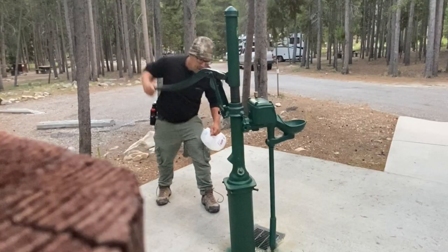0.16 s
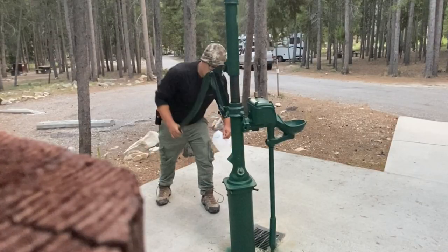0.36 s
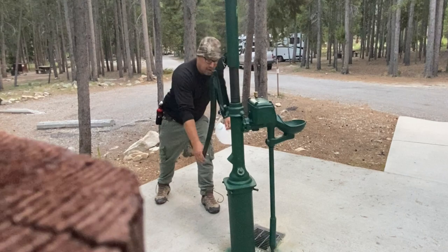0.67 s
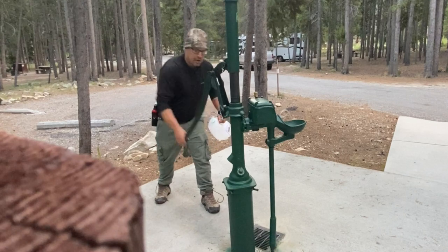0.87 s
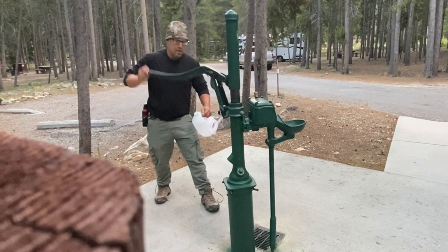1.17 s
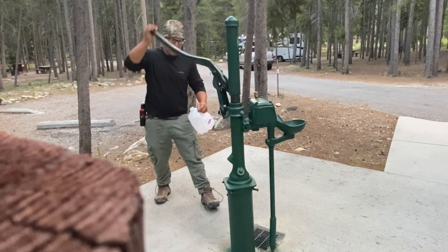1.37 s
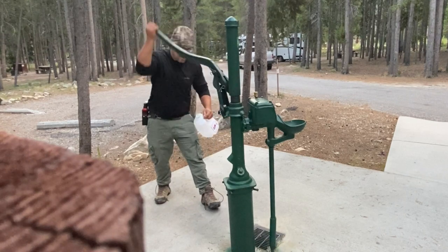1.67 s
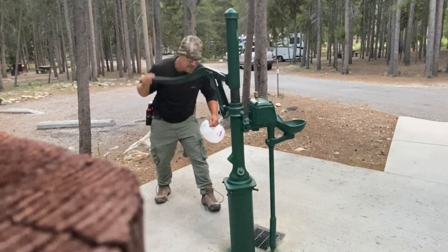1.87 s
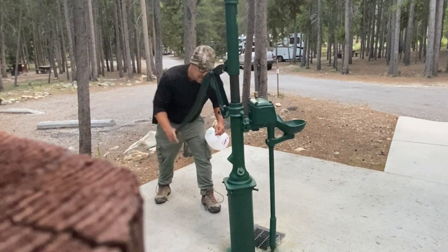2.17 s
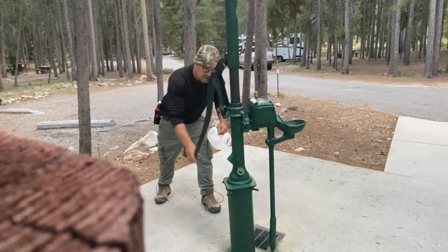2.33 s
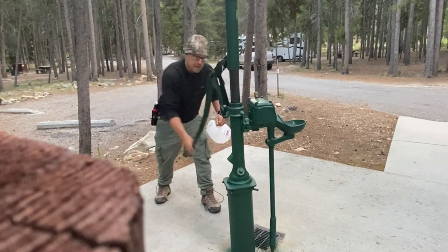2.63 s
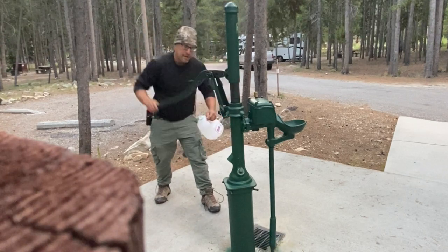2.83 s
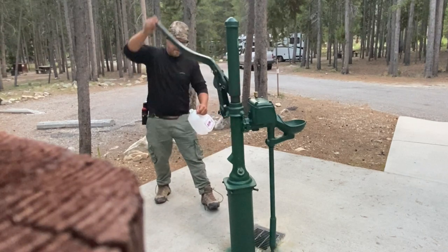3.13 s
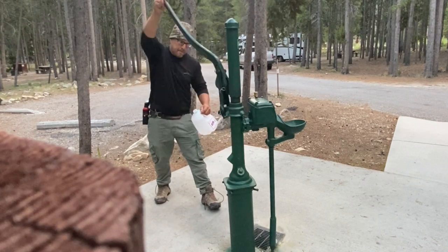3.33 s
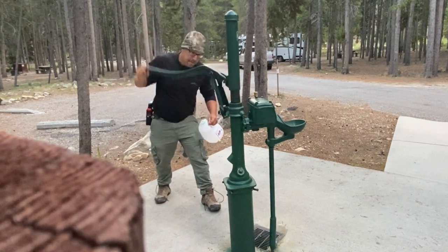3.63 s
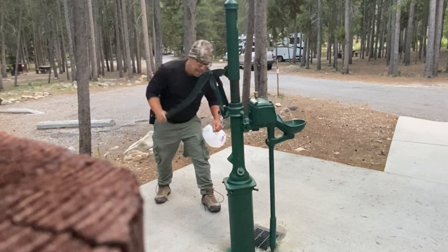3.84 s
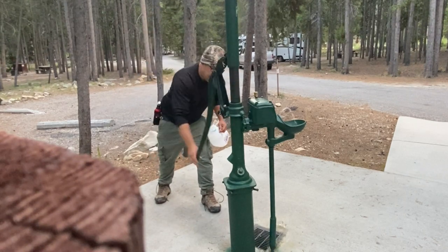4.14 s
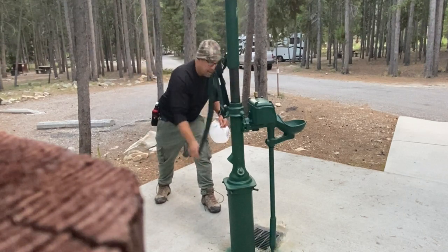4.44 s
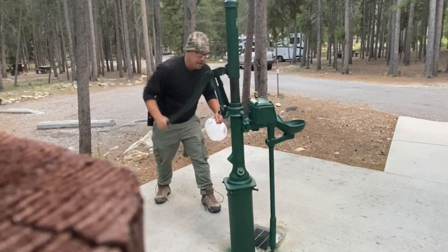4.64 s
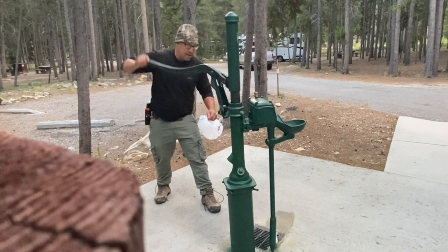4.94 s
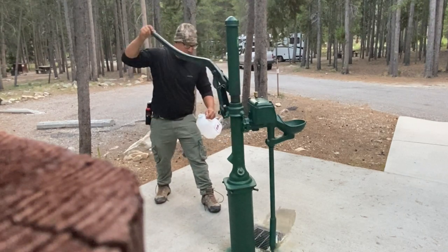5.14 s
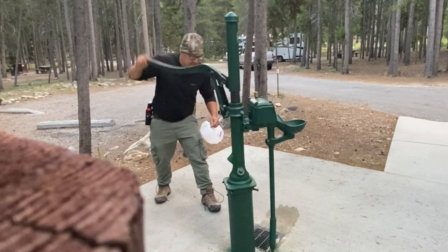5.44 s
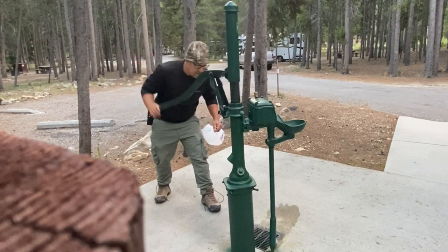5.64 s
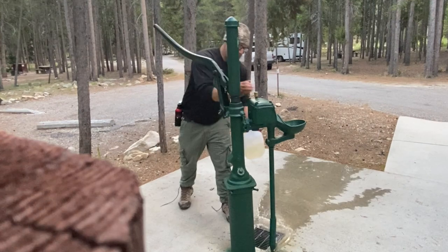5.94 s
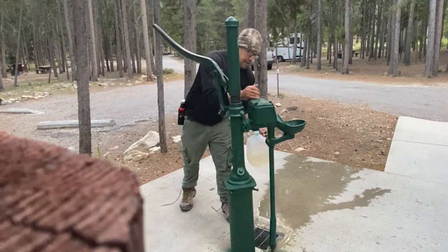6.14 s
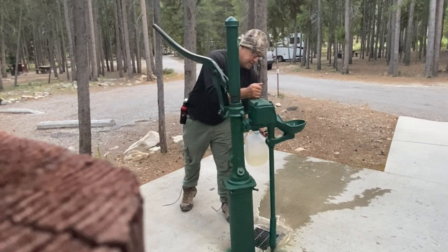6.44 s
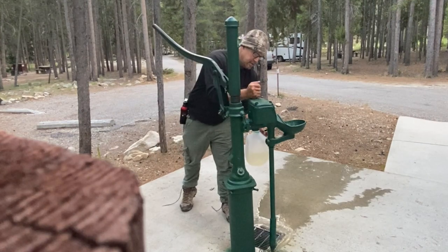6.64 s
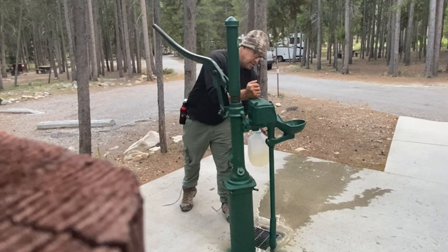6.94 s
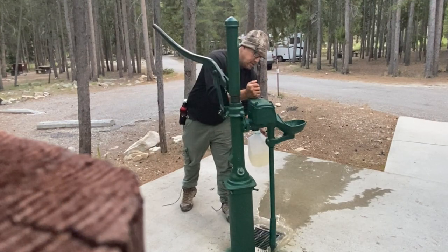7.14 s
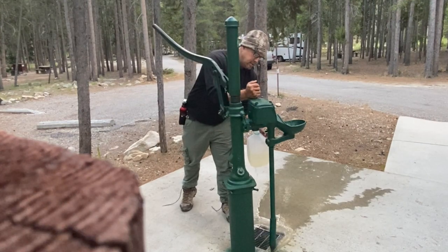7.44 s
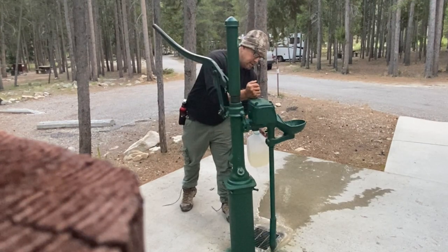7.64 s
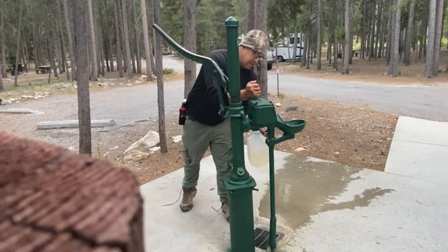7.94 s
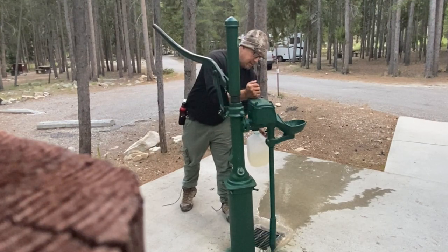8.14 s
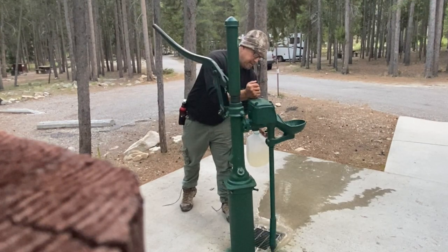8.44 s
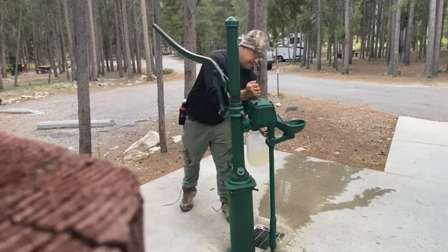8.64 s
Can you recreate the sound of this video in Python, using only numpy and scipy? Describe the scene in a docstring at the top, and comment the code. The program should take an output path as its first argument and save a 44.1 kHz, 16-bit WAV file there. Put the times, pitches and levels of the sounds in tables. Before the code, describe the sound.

Metallic rattling and clanking of an old hand water pump, loudest mid-way, gives way abruptly to dripping and soft bubbling as a jug fills.

```python
"""In a pine wood, a patchy background noise swells and fades, each swell reaching from treble down to bass.
Close by, a cast-iron hand pump is worked: lever blows and rubbing noise ring the casting's modes,
under a flickering hiss; early on, a loose pin ticks briefly as damped sines. Soft low puffs lean to the right.
Water gushes from the spout as spattered noise, with drops and bubbles as damped sines rising in pitch;
rubbing and sizzle stop abruptly, then water fills a jug with low glugs. A faint echo follows the pump."""
import sys
import numpy as np
from scipy import signal
from scipy.fft import rfft, irfft, next_fast_len
from scipy.io import wavfile
from scipy.ndimage import uniform_filter1d

SR = 44100
rng = np.random.default_rng(int(sys.argv[2]) if len(sys.argv) > 2 else 0)


def put_to_file(sound):
    """Save the sound as 16-bit audio at rate SR, in the file named by the first command-line argument."""
    columns = np.atleast_2d(sound).T  # one column per channel
    safe = np.clip(columns, -1, 1)
    whole_steps = np.round(safe * 32767)
    wavfile.write(sys.argv[1], SR, whole_steps.astype(np.int16))


N = 388080
TIME = np.arange(N) / SR  # s
CHANGE_S = 5.97  # rubbing and sizzle stop abruptly
RING = 2 ** 13  # samples in which a blow rings out

# swell of the background, before its shares are applied: time_s, bass_db, middle_db
BACKGROUND_SWELL = [(0, 2, -1), (.62, -4, -2), (.72, 8.5, 5), (1.25, -15, 9.5), (2.0, 13, 14.5),
                    (3.1, 10, 11.5), (3.5, 5.5, 20.5), (4.0, -4.5, 18), (4.4, 5, 5.5), (5.3, -4, 4),
                    (5.65, 4, 2), (6.0, -6, -2.5), (6.3, -14, 1), (6.5, -18, 6.5), (7.1, 10, 12.5),
                    (8.8, 9.5, 11)]
# relative colour of the background: freq_hz, density_db (per Hz)
BACKGROUND_COLOUR = [(28, -26), (80, -3.5), (350, -9), (730, -3.5), (1060, -6), (2240, -13.5),
                     (3500, -21.5), (5000, -19.5), (7000, -30.5), (10000, -41), (16000, -62)]
# share of the two swells at each frequency; the treble keeps the last row: freq_hz, bass_share, middle_share
SWELL_SHARE = [(99.4, 0.82, 0.1), (455, 0, 0.9), (1360, 0, 0.37), (3130, 0.27, 0)]
# a swell fills in from the top downward: start_s, bass_reached_s, edge_hz (lower edge one second
# before the bass is reached), extra_share (just above the edge)
SWELL_EDGES = [(1.03, 1.993, 1340, .1), (6.08, 7.06, 3000, .8)]
EDGE_BEND, EDGE_TOP_HZ, EDGE_LOW_HZ = 2.23, 3600, 25  # the edge falls as time left to this power
# thin flickering hiss high in the treble: time_s, level_db
TREBLE_HISS = [(0, -81), (.1, -71), (.72, -79), (.78, -56), (.87, -84), (1.45, -84), (2.2, -90),
               (2.45, -74.5), (3.4, -73), (4.1, -98), (4.5, -97), (8.8, -93)]
MIST_DB = -9  # the same hiss follows the water, relative to its flow

# iron on iron: start_s, force_db, thud_db, high_ring_db, rattle_s (its fall is capped at 0.2 s)
BLOWS = [(.048, -22, -22, 6, 0.05), (0.0959, -12, -20, -42, 0.16), (.167, -9, -17, -19, 0.038),
         (0.2845, -11.5, -15, -0.5, 0.12), (0.384, -11.5, -13, -1, 0.051), (0.489, -11, -13, 0, 0.1),
         (0.6808, -13.5, -5.5, -17, 0.091), (0.841, -17, -8, 2, 0.077), (0.881, -26, -8, 5, 0.072),
         (1.087, -5.5, -8, -5.5, 0.014), (1.1028, -1.5, -11, 0, 0.022), (1.7035, -14, -18, -37, 0.098),
         (1.7273, -9, -13, 0.5, 0.085), (1.785, -10, -43, -1.5, 0.14), (1.874, -11.5, -15, -4, 0.058),
         (2.017, -11.5, -18, -3, 0.05), (2.0426, -8.5, -14, -4, 0.11), (2.097, -12, -26, -1, 0.056),
         (2.1678, -13, -38, 3.5, 0.1), (2.2132, -11.5, -23, -3, 0.22), (2.4965, -15, 1, -40, 0.13),
         (2.542, -2, -16, -42, 0.06), (2.557, -0.5, -3, -2.5, 0.042), (2.877, 0, -12, 0, 0.047),
         (2.8971, 1.5, -56, -6, 0.045), (3.174, -3.5, -22, -1.5, 0.052), (3.2171, -12.5, 16, -13.5, 0.081),
         (3.269, 9, -8.5, 1, 0.077), (3.3054, -7.5, -4.5, 9.5, 0.065), (3.338, -1, -11, 1, 0.061),
         (3.374, -9.5, -20, -13, .05), (3.397, -6.5, -2, -1.5, 0.1), (3.4245, 16.5, -18.5, -3, 0.093),
         (3.4393, 23.5, -14, -5, 0.072), (3.452, 17.5, -3, -11.5, 0.046), (3.488, 10.5, -2.5, -8, 0.067),
         (3.501, 11.5, -6, -6.5, 0.021), (3.5346, -5, -42, -2.5, 0.25), (3.575, -17, 6.5, -16, 0.073),
         (3.643, -0.5, -23, -2, 0.087), (3.674, -3, -35, 0.5, 0.11), (3.706, -8, -11, 0, 0.09),
         (3.7803, 1, -22, -0.5, 0.14), (3.868, -18, -14, 6, 0.087), (3.907, -8, -22, -2, 0.13),
         (3.9376, 1, -8.5, -3, 0.11), (4.022, -2.5, -29, 0, 0.15), (4.254, -16, -30, 2.5, 0.12),
         (4.329, -3.5, -44, 9.5, 0.031), (4.3797, -2, -31, -21, 0.04), (4.484, -6.5, -9, -13, 0.053),
         (4.7988, -1.5, -28, -19, 0.037), (4.9275, -7.5, -13, 0, 0.029), (5.431, -13.5, -20, 3, 0.11),
         (5.5876, -7.5, -14.5, -5, 0.061), (5.675, -11.5, -13, -3, 0.071)]
# ringing modes of lever and stand: freq_hz, level_db, t60_s
IRON_MODES = [(235.8, -6, 0.17), (628, -13, 0.11), (684, -7, 0.13), (751.8, 6.5, 0.097), (863, -17, 0.088),
              (928, -11, 0.13), (1198, 2, 0.066), (1555, -7, 0.11), (1884, -12.5, 0.12),
              (2360, -16.5, 0.041), (2525, -8, 0.073), (2685, -4.5, 0.064), (2824, -6.5, 0.08),
              (3190, -7.5, 0.095), (4060, -8.5, 0.057), (4400, -2, 0.03), (6100, -17.5, 0.034),
              (7030, -7, 0.028), (7315, -11, 0.027)]
# dense small modes between them: freq_hz, density_db (per Hz)
IRON_BED = [(71, -68.5), (120, -4), (235, 2), (530, 10.5), (748, 3.5), (1020, 0), (1170, 1), (1700, -6.5),
            (2340, -7.5), (2750, -4.5), (3660, -6.5), (5600, -12), (7300, -23), (8250, -29), (14000, -33.5),
            (15500, -50.5)]
# thud, low ring, clank, high ring: low_hz, high_hz
IRON_REGIONS = [(150, 600), (600, 1450), (1450, 4500), (4500, 16000)]
LOW_RING_DB, LOW_PER_THUD, LOW_PER_FORCE = -1, 0.35, 0.22  # heavy, thudding blows wake the low ring
# first touch of a blow, snapping in the treble: level over force plus high ring, t60, lower edge
SNAP_DB, SNAP_T60_S, SNAP_HZ = -34.5, 0.003, 7800
# pivot and rod rub in their guides, cut off at CHANGE_S: start_s, length_s, level_db
STROKES = [(0.05, 0.88, -62.5), (1.72, 0.23, -59.5), (2.04, 0.93, -63), (3.2, 0.46, -51.5),
           (3.62, 0.847, -52), (5.42, 0.86, -65.5)]
STROKE_RISE_S, STROKE_SAG_DB_PER_S, STROKE_FALL_S, IDLE_DB = 0.094, 14, 0.1, -80
# clean modes of the loose linkage pin, each tick varies them a little:
# freq_hz, near_end_db, far_end_db, t60_s
PIN_MODES = [(2520, -3, -12, 0.11), (2895, -16, -1, .09), (3350, -9, -8, .06), (3990, -12, -6, .08),
             (4395, 2, -16, 0.05), (4720, -6, -10, .05), (5900, -18, 2.5, .06), (7337, -1, -17, 0.071)]
# the pin ticks in its hole: start_s, level_db, place (0 near end - 1 far end)
PIN_TICKS = [(1.277, -69, .9), (1.458, -69, .3), (1.474, -57, .2), (1.485, -50, .05), (1.588, -54.5, .95),
             (1.599, -60, .9)]
# low puffs, the left side 9 dB weaker: centre_s, level_db (right), length_s
PUFFS = [(2.067, -55.5, 0.15), (4.706, -53, 0.092)]

# gushes from the spout: start_s, length_s, level_db
GUSHES = [(4.55, 1.2, -60), (5.42, 0.57, -61)]
GUSH_RISE_S, GUSH_SAG_DB_PER_S, GUSH_FALL_S, TRICKLE_DB = 0.051, 5, 0.021, -78.5
# relative colour of the spray: freq_hz, density_db (per Hz)
SPRAY_COLOUR = [(700, -35), (1300, -16), (2400, -14), (3300, -9.5), (4800, -12.5), (6600, -12.5),
                (8000, -24), (9500, -15), (13000, -41)]
SIZZLE_HZ, SIZZLE_WIDE_HZ, SIZZLE_DB = 6550, 550, -11  # a band over the spray up to the abrupt change
# single drops and bubbles, before panning: start_s, level_db, pitch_hz, splat_db (relative to level_db)
DROPS = [(4.538, -31, 1750, -6.5), (4.7896, -26, 1200, -16), (4.8742, -31.5, 1610, -19),
         (5.918, -44, 1020, -19), (6.4338, -40, 3200, -31), (6.685, -45, 2110, -35),
         (6.834, -42, 2480, -12), (6.8778, -40, 2800, -30), (6.968, -45, 2280, -25),
         (7.176, -45, 2430, -17), (7.218, -43, 2450, -27), (7.362, -40, 2670, -13), (7.5387, -43, 2100, -5),
         (7.671, -39, 1810, -4), (7.729, -35.5, 1890, -11.5), (7.904, -32.5, 3520, -27),
         (8.321, -41.5, 2620, -7), (8.367, -34.5, 3450, -23), (8.527, -43, 2940, -17),
         (8.556, -41, 3770, -21), (8.761, -37.5, 3280, -18)]
# tiny droplets: least size over the flow before clumping, middle pitch, log spread of pitch
PATTER_DB, PATTER_HZ, PATTER_SPREAD = 1.5, 3590, 0.42
# bouts of gurgling: peak_s, level_db (least size before clumping), pitch_hz (middle)
BOUTS = [(4.72, -53, 1900), (5.1, -55, 1885), (5.3, -58, 1786), (6.9, -57.5, 2460), (7.2, -61, 2470),
         (7.72, -58, 1834)]
BOUT_FADE_DB_PER_S, GURGLE_FLOOR_DB = 39, -72  # before and after the height of a bout
# the stream into the jug: time_s, level_db
FILL = [(6.69, -91), (6.76, -62), (6.9, -64), (7.3, -64.5), (7.6, -61.5), (7.9, -62), (8.2, -67.5),
        (8.5, -67.5), (8.8, -67.5)]
# air trapped under the stream in the jug: least size once swelled in, middle pitch, log spread of pitch
GLUG_DB, GLUG_HZ, GLUG_SPREAD = -65.5, 810, .55

# how each source reaches left and right:
# freq_hz, balance_db (left minus right), likeness (0-1), right_lead_rad
FROM_BACKGROUND = [(100.5, 4, 0.65, -0.5), (237, 5.5, 0.1, -0.5), (454, 3, 0.68, 1.5), (953, 0, 0.46, 4),
                   (1660, 1.5, 0.7, 5), (3560, 2, 0.3, 5), (6530, -6, 0.5, 11), (10300, 1, 0.8, 11),
                   (12500, -8, 0.9, 2.5)]
FROM_PUMP = [(240, 6, 0.63, 0.5), (577, 4.5, 0.7, 2.5), (1080, 0.5, 0.94, -0.4), (1610, 0.5, 0.96, 0.78),
             (3080, 1, 0.74, 0.18), (5300, -2.5, 0.25, -1), (8300, 0.5, 0.28, -4), (11800, 0.5, 1, 1.5)]
FROM_SPOUT = [(400, 4, .7, .5), (1005, -7, 0.23, 1.3), (2520, 0, 0.34, 1.13), (3550, -1.5, 0.66, 2.3),
              (4550, 1, 0.65, 2.1), (6330, -5, 0.35, 4.04), (9400, -1, 0.26, 8.9), (13800, 0, 1, 1.9)]
TOP_HZ = 16400


def amp(db):
    """Decibels to gain."""
    return 10 ** (np.asarray(db) / 20)


def unit(x):
    """Scaled to rms 1."""
    return x / np.sqrt(np.mean(x ** 2) + 1e-20)


def unit_gain(gain):
    """Rms of a response over all frequencies."""
    return np.sqrt(np.mean(np.abs(gain) ** 2))


def along(points, hz):
    """Every column after the frequency, read on a log frequency axis."""
    f, *cols = np.transpose(points)
    return np.array([np.interp(np.log(hz + 1), np.log(f + 1), c) for c in cols])


def level(rows):
    """Gain per sample from (time_s, level_db) rows, -120 dB outside them."""
    s, db = np.transpose(rows)
    return amp(np.interp(TIME, s, db, left=-120, right=-120))


def held(rows, rise, sag_db, fall, rest_db):
    """Gain per sample of (start_s, length_s, level_db) events: rise from rest, sag while held, fall back."""
    shapes = []
    for s, length, db in rows:
        end = s + length
        corners = [s - rise / 2, s + rise / 2, end - fall / 2, end + fall / 2]
        shapes.append(np.interp(TIME, corners, [rest_db, db, db - sag_db * length, rest_db]))
    return amp(np.max(shapes, axis=0))


def wobble(rate):
    """A random curve, rate knots a second."""
    knots = rng.standard_normal(int(N * rate / SR) + 2)
    return np.interp(TIME * rate, np.arange(len(knots)), knots)


def filtered(x, response):
    """The sound shaped by a response of frequency."""
    m = next_fast_len(N + SR // 2)
    return irfft(rfft(x, m) * response(np.fft.rfftfreq(m, 1 / SR)), m)[..., :N]


def patchy(depth_db, bins, frames, size):
    """Two noises as short-time spectra, with patches of random gain."""
    hz, t, z = signal.stft(rng.standard_normal((2, N)), SR, nperseg=size)
    field = uniform_filter1d(rng.standard_normal(z.shape[1:]), bins, 0)
    field = uniform_filter1d(field, frames, 1)
    return hz, t, z * unit(amp(depth_db * unit(field)))


def bursts(rows, attack):
    """Envelope of (start_s, level_db, t60_s) events adding in power: quick rise, exponential fall."""
    power, t = np.zeros(N + SR), np.arange(SR // 2) / SR
    for s, db, t60 in rows:
        power[round(s * SR):][:len(t)] += amp(2 * db - 120 * t / t60) * (1 - np.exp(-t / attack))
    return np.sqrt(power[:N])


def bubbles(rows, cycles):
    """Softly started damped sines whose pitch rises as the bubble nears the surface, 60 dB down after cycles."""
    s, db, hz = rows
    t = np.arange(SR // 30) / SR
    age = hz[:, None] * t / cycles
    tone = np.sin(2 * np.pi * hz[:, None] * t * (1 + 0.056 * age))
    wave = amp(db[:, None] - 60 * age) * (1 - np.exp(-age / 0.048)) * tone
    at = np.round(s * SR).astype(int)[:, None] + np.arange(len(t))
    return np.bincount(at.ravel(), wave.ravel(), N + SR)[:N]


def ports(pair, path):
    """Two unrelated versions of a sound become left and right: shared part, own part, balance and lag."""
    m = next_fast_len(N + RING)
    shared, own = rfft(pair, m)
    balance_db, alike, lead = along(path, np.fft.rfftfreq(m, 1 / SR))
    turn = np.arccos(np.clip(alike, 0, 1)) / 2
    shared, own = shared * np.cos(turn), own * np.sin(turn)
    tilt = amp(balance_db / 2) * np.exp(-.5j * lead)
    return irfft(np.array([(shared + own) * tilt, (shared - own) / tilt]), m)[:, :N]


def background():
    """A patchy background noise swells and fades, each swell reaching from the treble down to the bass."""
    hz, t, z = patchy(1.9, bins=5, frames=3, size=1024)
    s, *cols = np.transpose(BACKGROUND_SWELL)
    swell_db = along(SWELL_SHARE, hz).T @ np.array([np.interp(t, s, c) for c in cols])
    edge_hz, crest = 0, 0
    for start, end, speed_hz, extra in SWELL_EDGES:
        edge_hz = edge_hz + speed_hz * np.clip(end - t, 0, None) ** EDGE_BEND * (t > start)
        crest = crest + extra * (t > start) * (t < end)
    ratio = (hz[:, None] + 1) / np.clip(edge_hz, EDGE_LOW_HZ, EDGE_TOP_HZ)
    hump = np.exp(-(np.log(ratio / 1.53) / 0.49) ** 2)  # just above the edge
    reached = (1 + crest * hump) / (1 + ratio ** -7.)
    colour = amp(along(BACKGROUND_COLOUR, hz).T)
    z = z * colour / unit_gain(colour) * amp(reached * swell_db)
    noise = signal.istft(z, SR, nperseg=1024)[1][:, :N]
    return amp(-61.5) * ports(noise, FROM_BACKGROUND)


def treble_hiss():
    """A broad high band of flickering noise around 11.8 kHz, on its own curve and following the water."""
    flicker = rng.standard_normal((2, N)) * amp(2.5 * wobble(12) + 4 * wobble(90))
    thin = unit(filtered(flicker, lambda hz: np.exp(-((hz - 11800) / 3200) ** 4)))
    return (level(TREBLE_HISS) + amp(MIST_DB) * flow()) * thin


def iron(hz, tints_db, spot_db):
    """The casting's answer: sharp modes, weighed by contact spot, over a dense bed; tints weigh the regions."""
    c, db, t60 = np.transpose(IRON_MODES)[..., None]
    width = np.log(1000) / np.pi / t60
    signs = (-1) ** np.arange(len(c))[:, None]
    shapes = signs * 45j * hz / (c * c - hz * hz + 1j * hz * width)
    bed = amp(-4.5 + along(IRON_BED, hz)[0])
    bands = np.array([1 / (1 + 1j * hz / hi) ** 3 / (1 + lo / (1j * hz + 1e-9)) ** 3
                      for lo, hi in IRON_REGIONS])
    plain = amp(db[:, 0]) @ shapes + bed
    bands = bands / [[unit_gain(plain * band)] for band in bands]
    return (amp(db[:, 0] + spot_db) @ shapes + bed) * (amp(tints_db) @ bands)


def blows():
    """Each blow is a hard crack and a gritty rattle of small contacts, landing on its own spot."""
    s, force_db, thud_db, high_db, rattle = np.transpose(BLOWS)
    t = np.arange(RING) / SR
    fall = amp(-60 * t / np.clip(rattle, .01, .2)[:, None]) + 1.8 * amp(-60 * t / 0.0088)
    rise = 0.0052 * rattle * amp(-.55 * (force_db - 26.0))  # weak, long contacts slide in softly
    contacts = amp(4.5 * uniform_filter1d(rng.standard_normal((len(s), RING)), 36) * 6)
    force = fall * (1 - np.exp(-t / rise[:, None])) * contacts * (t < RING / SR / 2)
    force = force[:, None] * rng.standard_normal((len(s), 2, RING))
    strength = amp(force_db) * np.sqrt(rattle)
    force = force / np.linalg.norm(force, axis=2, keepdims=True) * strength[:, None, None]

    # heavy blows vary less in tone
    spots_db = 3.5 * rng.standard_normal((len(s), len(IRON_MODES)))
    spots_db = spots_db * amp(-.5 * np.maximum(force_db, 0))[:, None]
    low_db = LOW_RING_DB + LOW_PER_THUD * thud_db + LOW_PER_FORCE * force_db
    tints_db = np.transpose([thud_db, low_db, 0 * s, high_db])
    answer = iron(np.fft.rfftfreq(RING, 1 / SR), tints_db, spots_db)
    fade = np.clip(4 * (.9 - t * SR / RING), 0, 1)  # the ringing is faded out before its window ends
    rings = irfft(rfft(force) * answer[:, None], RING) * fade
    # the force sets the energy that comes out
    answer_gain = np.sqrt(np.mean(np.abs(answer) ** 2, axis=1))
    due = np.linalg.norm(force, axis=2) * answer_gain[:, None]
    rings = rings * (due / np.linalg.norm(rings, axis=2))[..., None]

    snap_rows = np.transpose([s, force_db + high_db + SNAP_DB, np.full_like(s, SNAP_T60_S)])
    fizz = filtered(rng.standard_normal((2, N)), lambda hz: 1 / (1 + (SNAP_HZ / (hz + 1)) ** 6))
    out = np.zeros((2, N + RING))
    out[:, :N] = bursts(snap_rows, 0.000098) * fizz
    for at, ring in zip(np.round(s * SR).astype(int), rings):
        out[:, at:at + RING] += ring
    return out[:, :N]


def scrape():
    """Gritty rubbing noise rings the casting, wandering between eight contact spots."""
    roughness = amp(2.5 * wobble(45) + 5.1 * np.clip(wobble(600), -2, 1.7))
    grit = rng.standard_normal((2, N)) * unit(roughness)
    rub = held(STROKES, STROKE_RISE_S, STROKE_SAG_DB_PER_S, STROKE_FALL_S, IDLE_DB) * (TIME < CHANGE_S)
    spots_db = 6.5 * rng.standard_normal((8, len(IRON_MODES)))
    spots_db = spots_db - 10 * np.log10(np.mean(amp(2 * spots_db), axis=0))  # mean power kept per mode
    answers = irfft(iron(np.fft.rfftfreq(RING, 1 / SR), [-9, 4, 8.5, 3.5], spots_db), RING)
    shares = amp([10 * wobble(18) for _ in spots_db])
    shares = shares / np.linalg.norm(shares, axis=0)
    fresh = rng.choice([-1, 1], (len(shares), N))  # random signs keep the spots unrelated
    drive = (shares * fresh)[:, None] * rub * grit
    return signal.fftconvolve(drive, answers[:, None], axes=2).sum(0)[:, :N]


def pin():
    """Each tick rings the pin's modes as its place weighs them, with a tiny noise click."""
    hz, near_db, far_db, t60 = np.transpose(PIN_MODES)[..., None]
    out, t = np.zeros((2, N + RING)), np.arange(RING // 2) / SR
    for s, db, place in PIN_TICKS:
        mode_db = near_db + place * (far_db - near_db) + 1.5 * rng.standard_normal(hz.shape)
        modes = amp(mode_db - 60 * t / t60) * np.sin(2 * np.pi * hz * t)
        ring = np.sum(modes, axis=0) * (1 - np.exp(-t / 0.00055))
        click = 1.34 * amp(-60 * t / 0.0095) * rng.standard_normal((2, len(t)))
        out[:, round(s * SR):][:, :len(t)] += amp(db) * (ring * [[1], [.6]] + click)
    return out[:, :N]


def pump():
    """Hiss, blows, rubbing and pin share one path to left and right."""
    return ports(treble_hiss() + blows() + scrape() + pin(), FROM_PUMP)


def puffs():
    """Low buffeting noise in bell-shaped puffs, stronger on the right."""
    swell = sum(amp(db) * np.exp(-((TIME - s) / length) ** 2 * 4) for s, db, length in PUFFS)
    buffet = unit(filtered(rng.standard_normal(N), lambda f: f ** 2 / (1 + (f / 65) ** 4)))
    return swell * buffet * amp([[-9], [0]])


def flow():
    """How strongly the water runs: the stronger of gushes and filling stream, over a trickle."""
    gushes = held(GUSHES, GUSH_RISE_S, GUSH_SAG_DB_PER_S, GUSH_FALL_S, TRICKLE_DB)
    return np.maximum(gushes, level(FILL)) * (TIME > GUSHES[0][0] - GUSH_RISE_S)


def spray():
    """Countless tiny splats: patchy, spattering noise that follows the flow, plus a sizzling band."""
    noise = signal.istft(patchy(3.6, bins=8, frames=7, size=256)[2], nperseg=256)[1][:, :N]
    spatter = amp(3.5 * wobble(70) + 5 * wobble(450))
    wash = unit(filtered(spatter * noise, lambda hz: amp(along(SPRAY_COLOUR, hz)[0])))
    sizzle = filtered(rng.standard_normal((2, N)),
                      lambda hz: np.exp(-((hz - SIZZLE_HZ) / SIZZLE_WIDE_HZ) ** 2))
    sizzle = unit(sizzle) * (TIME < CHANGE_S)
    return flow() * (wash + amp(SIZZLE_DB) * sizzle)


def drops():
    """Drops that stand out, each a pitched bubble."""
    s, db, hz, _ = np.transpose(DROPS)
    return bubbles((s, db, hz), 27.0)


def splats():
    """Bright noise bursts as drops land, with 400 lesser ones from 6.05 s on."""
    s, db, _, splat_db = np.transpose(DROPS)
    envelope = bursts(np.transpose([s, db + splat_db, np.full_like(s, .02)]), 0.00023)
    spits = rng.random((400, 2))
    lesser_db = -70 - 3.2 * np.log(spits[:, 1])
    lesser = np.transpose([6.05 + 2.75 * spits[:, 0], lesser_db, np.full(len(spits), .014)])
    envelope = envelope + bursts(lesser, 0.00017)
    bright = filtered(rng.standard_normal((2, N)), lambda f: 1 / (1 + (3000 / (f + 1)) ** 2))
    return envelope * unit(bright)


def gurgle(count):
    """Dense small bubbles that swell in bouts, with a narrower spread of pitch after the abrupt change."""
    draw = rng.random((count, 3))
    when = GUSHES[0][0] + (N / SR - GUSHES[0][0]) * draw[:, 0]
    at, bout_db, middle_hz = np.transpose(BOUTS)
    bout_db = np.max(bout_db - BOUT_FADE_DB_PER_S * np.abs(when[:, None] - at), axis=1)
    size_db = np.maximum(bout_db, GURGLE_FLOOR_DB) - 2.8 * np.log(draw[:, 1])
    size_db = size_db + 4 * wobble(19)[(when * SR).astype(int)]
    spread = np.where(when < CHANGE_S, .8, .2)
    pitch_hz = np.interp(when, at, middle_hz) * np.exp(spread * (draw[:, 2] - .5))
    return bubbles((when, size_db, pitch_hz), 44.0)


def patter(count):
    """Short pitched droplets, clumped, their strength following the flow."""
    draw, tone = rng.random((count, 2)), rng.standard_normal(count)
    when = GUSHES[0][0] + (N / SR - GUSHES[0][0]) * draw[:, 0]
    at = (when * SR).astype(int)
    flow_db = 20 * np.log10(flow()[at] + 1e-9)
    size_db = flow_db + PATTER_DB - 3 * np.log(draw[:, 1]) + 3 * wobble(25)[at]
    pitch_hz = np.clip(PATTER_HZ * np.exp(PATTER_SPREAD * tone), 800, 13000)
    return bubbles((when, size_db, pitch_hz), 26.0)


def glug(count):
    """Dense low bubbles in the jug, swelling in as the water deepens."""
    draw, tone = rng.random((count, 2)), rng.standard_normal(count)
    when = FILL[0][0] + (N / SR - FILL[0][0]) * draw[:, 0]
    size_db = GLUG_DB - 12 * np.exp(-(when - FILL[0][0]) / 0.13) - 3.1 * np.log(draw[:, 1])
    pitch_hz = np.clip(GLUG_HZ * np.exp(GLUG_SPREAD * tone), 350, 3000)
    return bubbles((when, size_db, pitch_hz), 28.0)


def water():
    """Noisy spray and splats with clear pitched bubbles, on one path to left and right."""
    clear = drops() + gurgle(count=1600) + patter(count=1400) + glug(count=900)
    return ports(spray() + splats() + clear * amp([[0], [-8]]), FROM_SPOUT)


def scene():
    """All sources, out of doors; the trunks return a short faint echo of the pump."""
    near = pump()
    t = np.arange(SR // 3) / SR
    trunks = rng.standard_normal((2, len(t))) * amp(-60 * t / 0.29) * (t > .012)
    echo = signal.fftconvolve(near, trunks / np.linalg.norm(trunks[0]), axes=1)[:, :N]
    return background() + near + amp(-13.5) * echo + puffs() + water()


def record(dry):
    """Treble falls by 20 dB between 14 and 14.4 kHz; nothing sounds above TOP_HZ."""
    return filtered(dry, lambda hz: (hz < TOP_HZ) * amp(-20 * np.clip((hz - 14000) / 400, 0, 1)))


dry = scene()
out = record(dry)
put_to_file(out)
```